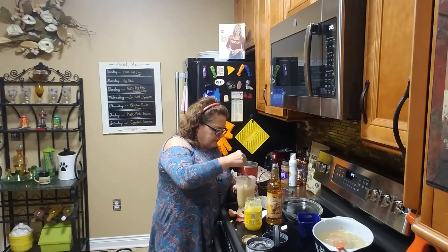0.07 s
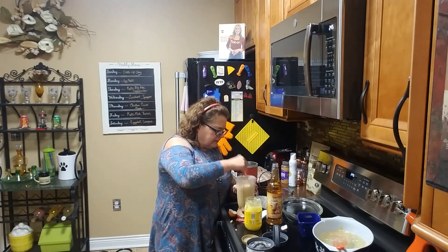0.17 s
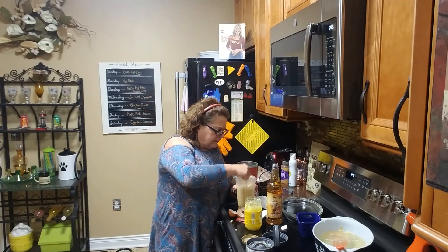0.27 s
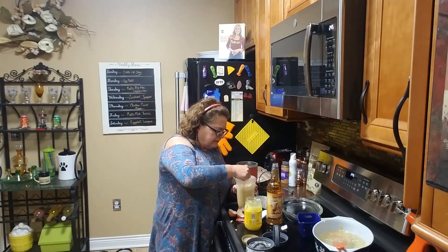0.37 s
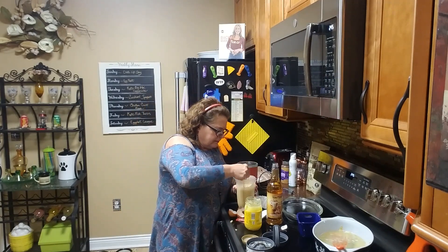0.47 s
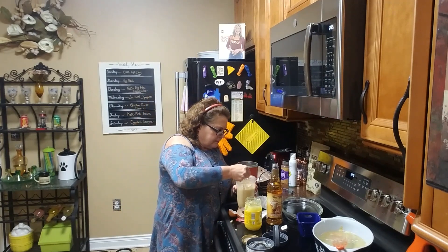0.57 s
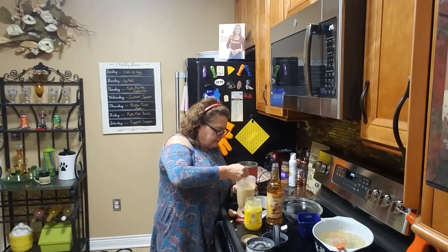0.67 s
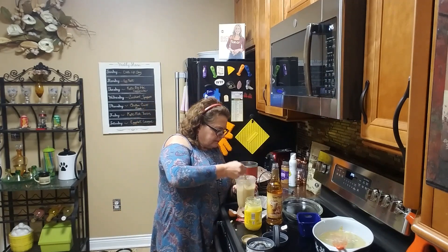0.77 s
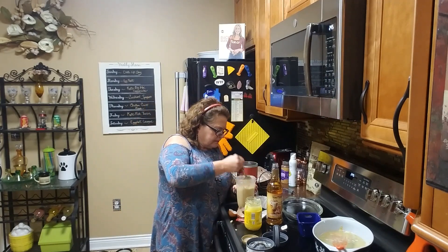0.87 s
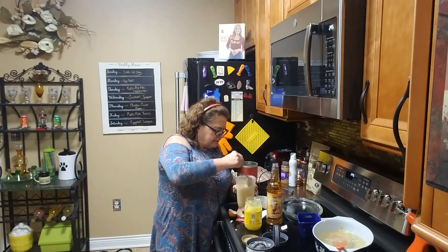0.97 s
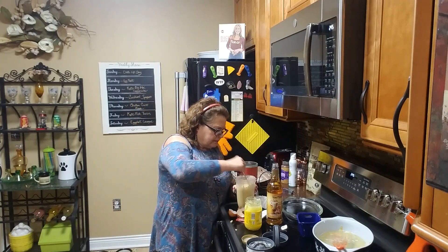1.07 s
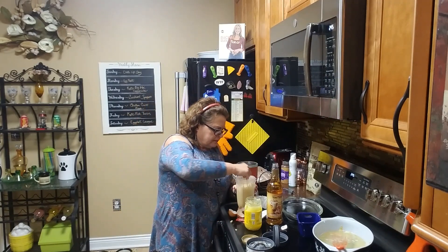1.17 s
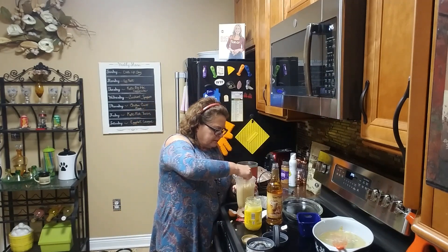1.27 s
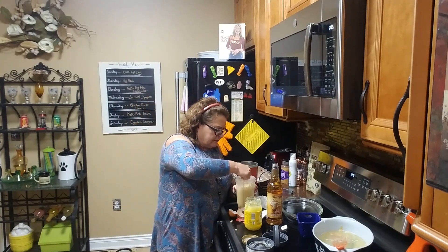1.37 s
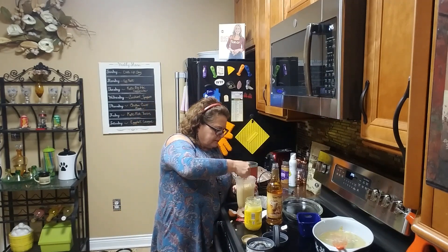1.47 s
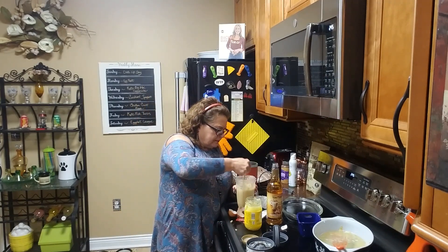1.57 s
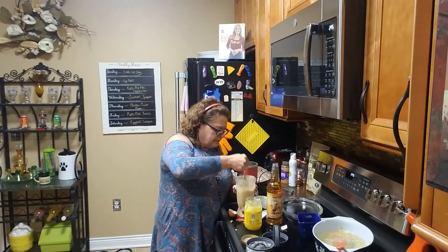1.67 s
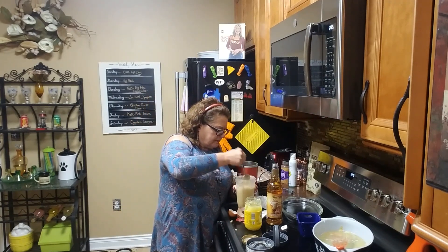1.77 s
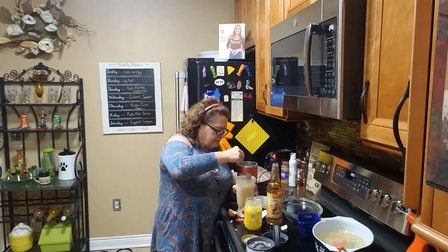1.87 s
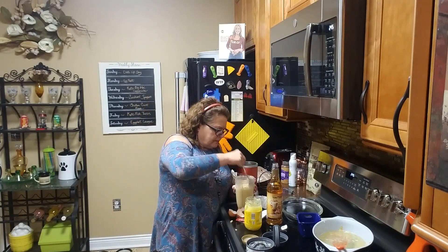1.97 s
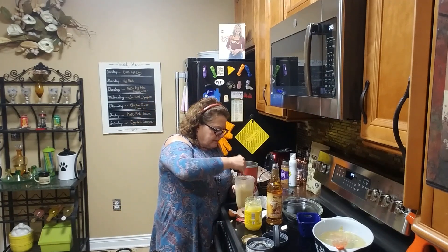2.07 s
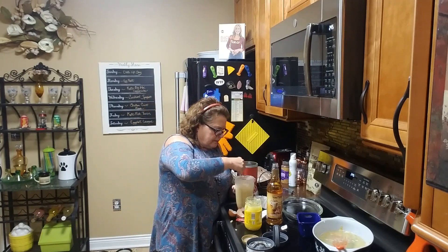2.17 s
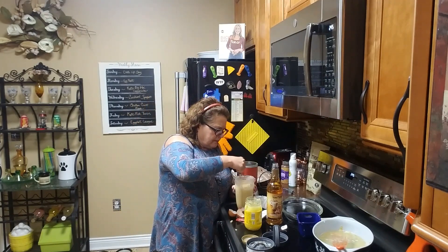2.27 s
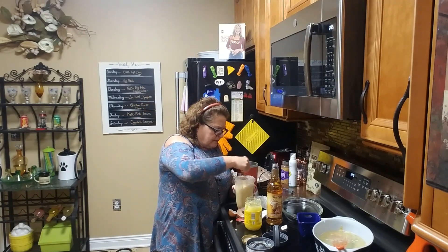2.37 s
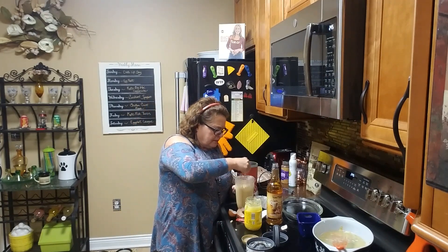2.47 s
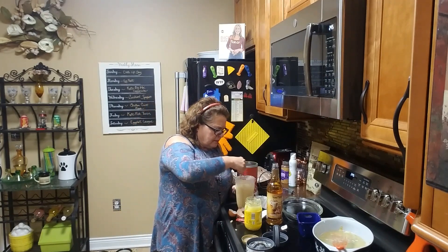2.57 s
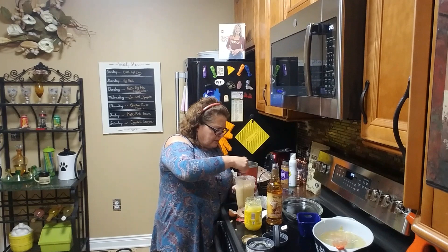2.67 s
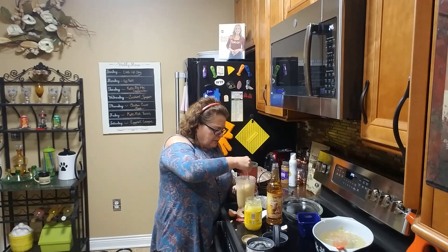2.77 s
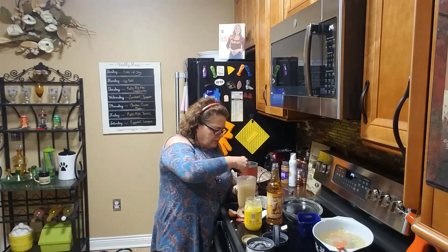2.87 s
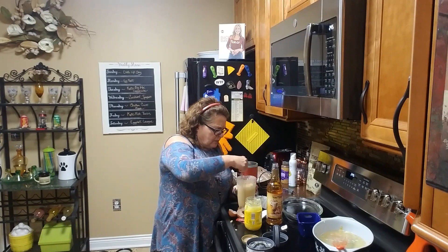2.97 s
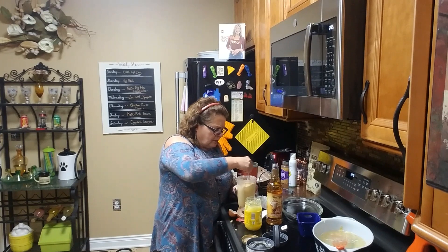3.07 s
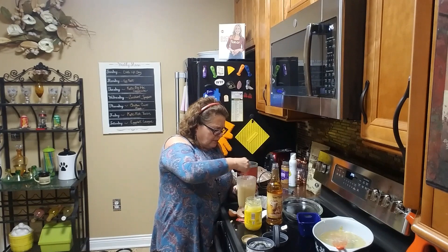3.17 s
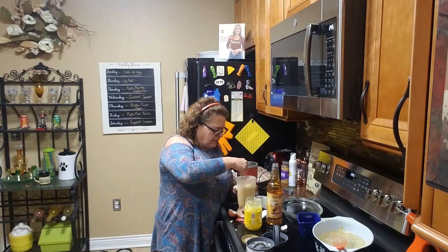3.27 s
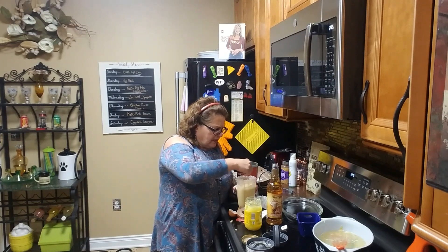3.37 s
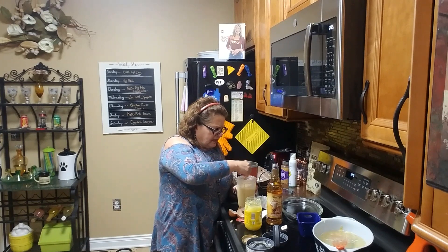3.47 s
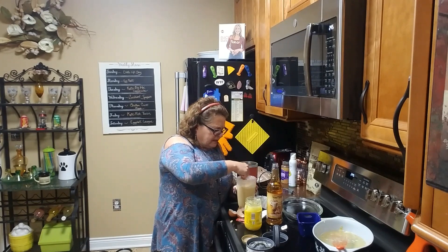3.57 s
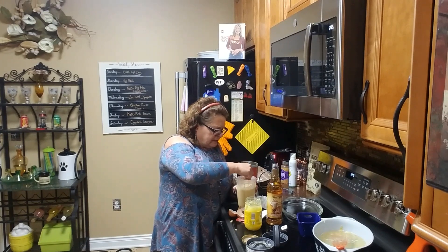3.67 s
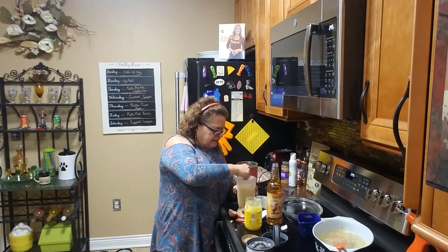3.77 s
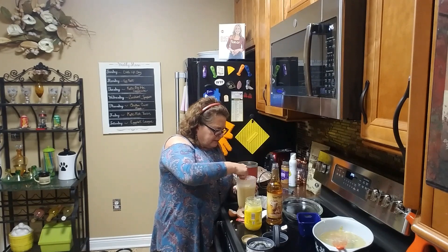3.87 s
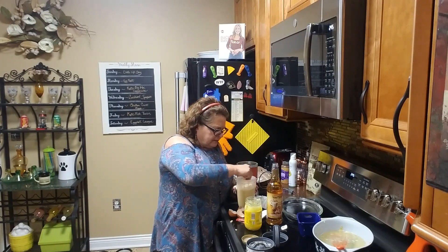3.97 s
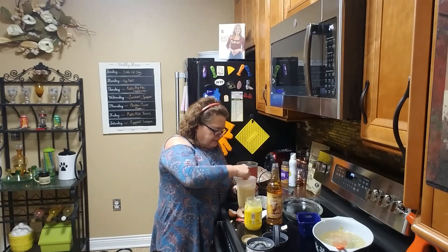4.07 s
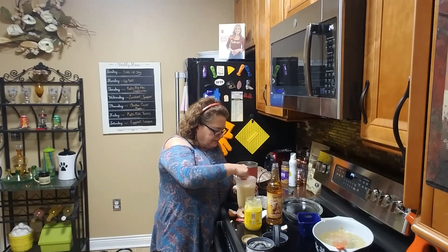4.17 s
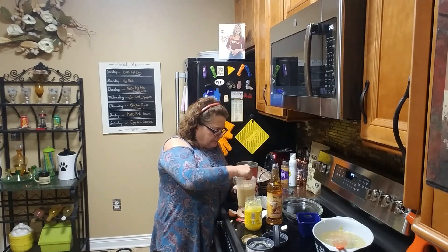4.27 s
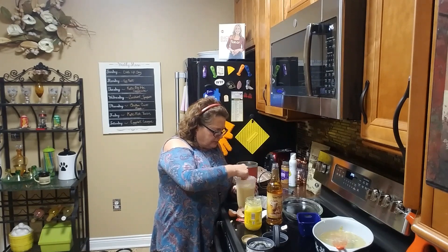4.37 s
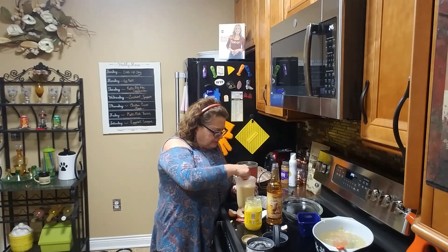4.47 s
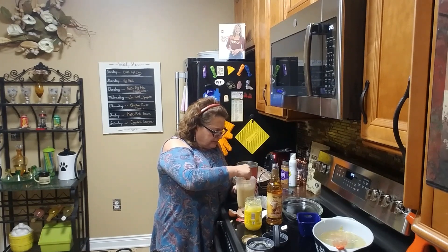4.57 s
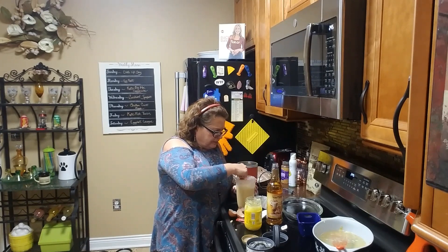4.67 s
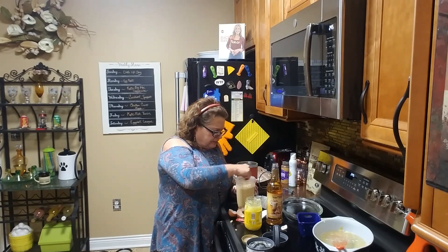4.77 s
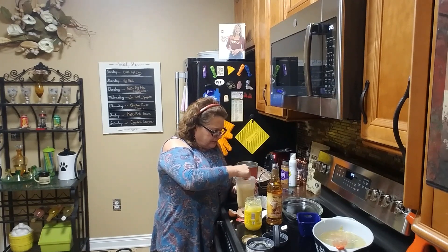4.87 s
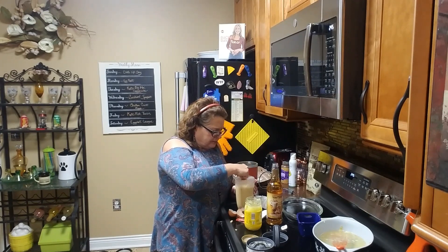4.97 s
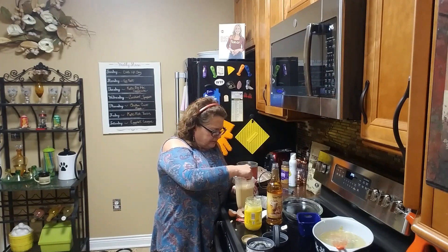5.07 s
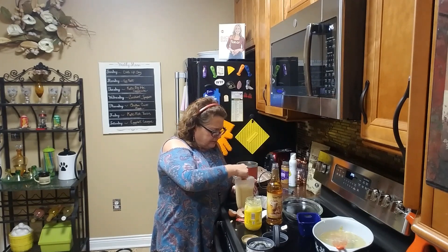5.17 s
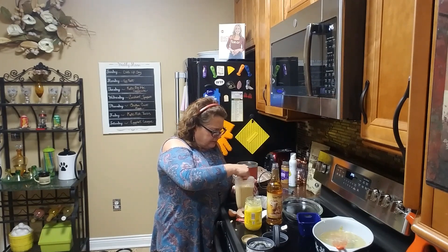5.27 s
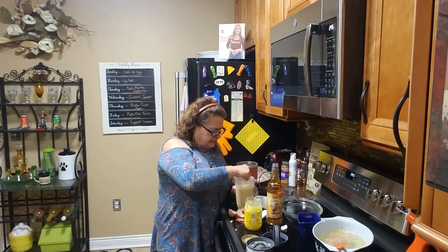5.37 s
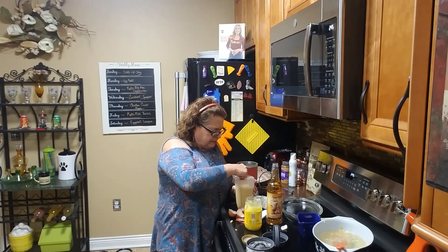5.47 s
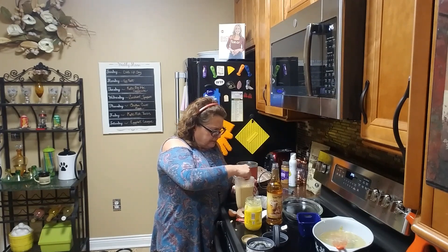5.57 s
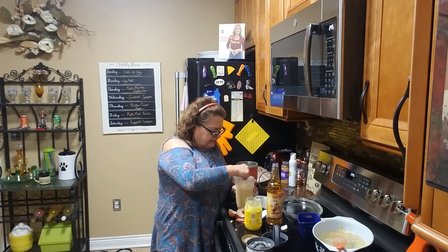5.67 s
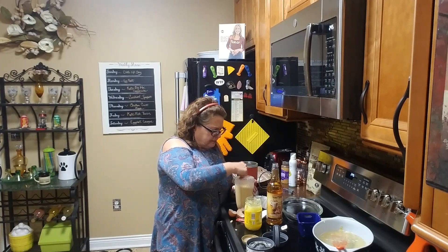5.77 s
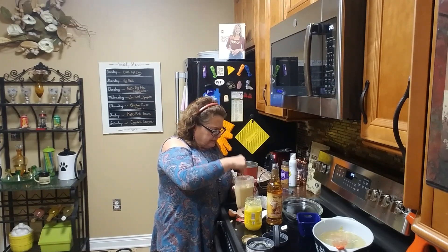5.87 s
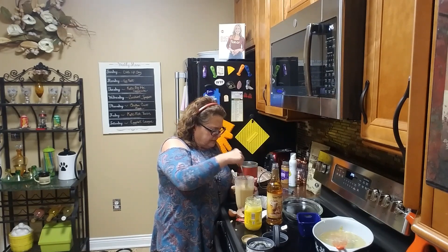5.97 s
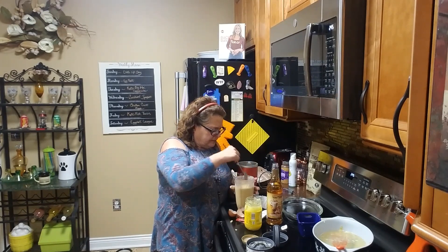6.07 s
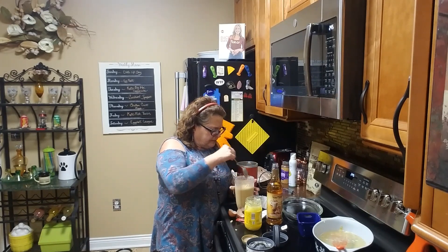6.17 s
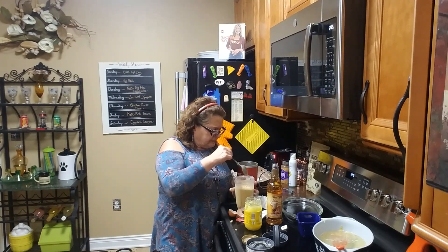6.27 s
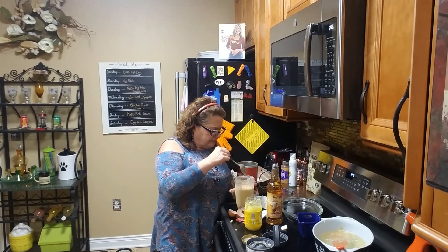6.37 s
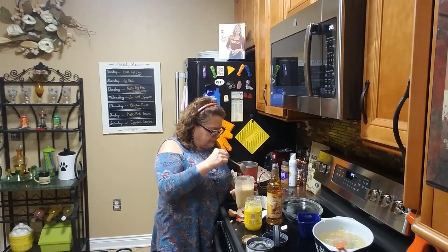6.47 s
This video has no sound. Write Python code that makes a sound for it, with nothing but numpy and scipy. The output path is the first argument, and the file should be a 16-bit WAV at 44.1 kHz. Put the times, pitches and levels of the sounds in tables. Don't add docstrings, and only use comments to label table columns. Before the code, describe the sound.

Quiet room tone with a low fridge hum in a small, hard kitchen, heard in stereo from a few metres away. From 0.1 to 0.5 s a spoon and glass are knocked about: small clacks and weighty wooden thuds. A near pause follows, then another loose cluster at 1.1 to 1.45 s. Around 1.8 s stirring starts, with firm blows from 2.0 s roughly every third of a second and lighter taps between. Each is a short, dry, drink-damped clack with a bright metallic tick, followed by a dull knock of the glass foot on the counter. Gritty scraping fills the gaps, easing before each blow. From 3.4 s it gets louder and denser, with almost four blows a second, loudest from 4.8 to 5.6 s. Stirring stops near 5.7 s; short reflections fade, a few faint taps follow around 5.9 s and later, and room tone remains until 6.5 s.

```python
import sys
import numpy as np
from scipy import signal
from scipy.fft import rfft, irfft, next_fast_len
from scipy.io import wavfile
from scipy.ndimage import uniform_filter1d

SR = 44100
rng = np.random.default_rng(int(sys.argv[2]) if len(sys.argv) > 2 else 0)


def dump(signal):
    limited = np.clip(np.atleast_2d(signal).T, -1, 1)
    pcm = np.round(limited * 32767).astype(np.int16)
    wavfile.write(sys.argv[1], SR, pcm)


def volts(x):
    e = np.asarray(x, float) / 20
    return 10 ** e


N = 288105
T = np.arange(N) / SR

# (f/Hz, level/dB, t60/s)
COUNTER_MODES = [(366, -8, 0.13), (433.7, 4.5, 0.056), (482, -1.5, 0.067)]
# (f/Hz, level/dB, t60/s)
UPPER_MODES = [(596, -0.5, 0.033), (676, -1.5, 0.028), (760.4, -1, 0.028), (825, -3.5, 0.033),
               (958, -7.5, 0.046), (1078, -7, 0.014), (880, -9, 0.016)]
# (f/Hz, level/dB, t60/s)
DEEP_MODES = [(58.3, -8, 0.15), (186.4, -11.5, 0.3), (218.6, -11, 0.12)]
# (t/s, clack/dB, thud/dB, hardness/dB)
BLOWS = [(1.992, -16.5, -20, -3), (2.3745, -16.5, -19, -4.5), (2.7225, -17.5, -18, -3),
         (3.052, -14, -14, -2.5), (3.364, -10.5, -15.5, 0), (3.676, -9.5, -12.5, -2.5),
         (3.968, -7.5, -11, -0.5), (4.225, -7, -12.5, 0.5), (4.495, -7, -14, 0.5), (4.7665, -5, -9, 1.5),
         (5.0306, -4, -15.5, 1.5), (5.2964, -3, -12.5, 3), (5.5613, -3, -16, 2.5)]
BLOW_HZ = 1640


def unit(x):
    return x / np.sqrt(np.mean(x ** 2))


def colour(x, hz, db):
    size = next_fast_len(x.shape[-1])
    f = np.arange(size // 2 + 1) * SR / size + 1
    weight = volts(np.interp(np.log(f), np.log(hz), db))
    return irfft(rfft(x, size) * weight, size)[..., :x.shape[-1]]


def causal_colour(x, hz, db):
    f = np.arange(2049) * SR / 4096 + 1
    cepstrum = irfft(np.log(volts(np.interp(np.log(f), np.log(hz), db))))
    cepstrum[1:2048] *= 2
    cepstrum[2049:] = 0
    response = irfft(np.exp(rfft(cepstrum)))
    return signal.fftconvolve(x, response)[:N]


def ring(modes, scatter_db, push_s, size=5000, detune=.04):
    t = np.arange(size) / SR
    hz, db, t60 = np.transpose(modes)[:, :, None]
    luck = rng.standard_normal((2, 9, 1))[:, :len(modes)]
    strength = volts(db + scatter_db * luck[0])
    tones = np.sin(2 * np.pi * hz * (1 + detune * luck[1]) * t)
    y = np.sum(strength * tones * 1000. ** (-t / t60), axis=0)
    push = np.sin(np.pi * np.clip((t[:64] + .5 / SR) / push_s, 0, 1)) + 1e-9
    y = np.convolve(y, push)[:size]
    return y / np.abs(y).max()


def add(out, s, y):
    i = int(s * SR)
    out[..., i:i + y.shape[-1]] += y[..., :N - i]


def contacts():
    # (t/s, clack/dB,
    # thud/dB, wall pitch f/Hz, hardness/dB)
    taps = [(1.816, -40, -32.5, 1600, -10), (1.881, -40.5, -32.5, 4140, -4),
            (1.907, -27, -36, 1700, 1), (2.081, -22.5, -14, 1710, 0.5), (2.1983, -22.5, -26, 2080, 0),
            (2.3014, -28, -27, 1500, 2), (2.4539, -23.5, -18, 1650, 2), (2.508, -40.5, -41, 1700, 7),
            (2.5531, -19.5, -18.5, 2160, 1), (2.659, -27.5, -23, 1570, 1.5),
            (2.7892, -23.5, -17, 1600, 4), (2.8947, -19, -20, 2090, -1.5), (2.9597, -26, -20, 1520, 2),
            (3.004, -29.5, -43, 2170, 4), (3.128, -27, -14, 1620, 3), (3.2017, -20, -18, 1780, 2),
            (3.2446, -30.5, -25, 1800, -3), (3.2937, -22.5, -20, 1600, -2),
            (3.4284, -19.5, -18, 2070, 0), (3.469, -25, -21, 2580, -6), (3.5289, -20, -19, 1620, -7),
            (3.555, -17, -52, 1470, 0),
            (3.7328, -19.5, -7, 1560, 1.5), (3.7971, -21, -14, 1820, 1),
                 (3.825, -20.5, -42, 1790, -6.5), (3.8538, -15.5, -10, 1630, -0.5),
                 (4.008, -25, -13, 1810, 4), (4.0789, -16.5, -12, 2230, 4), (4.123, -12.5, -13.5, 1810, 2),
                 (4.2712, -14, -13, 1550, -1.5), (4.3494, -18, -15, 1870, 3), (4.3753, -14, -51, 1580, -1),
                 (4.4089, -18, -12, 1280, 0), (4.428, -11, -33, 1820, 0), (4.6187, -24, -20.5, 2270, 5.5),
                 (4.658, -23, -19, 1750, -9), (4.8783, -17, -10, 2650, 0), (4.9155, -17.5, -27, 2190, -2),
                 (5.1424, -26.5, -19.5, 2580, 3), (5.1919, -7.5, -26, 1900, 0),
                 (5.467, -27.5, -55, 1710, 3.5)]
    # (t/s, clack/dB, thud/dB, wall pitch f/Hz, hardness/dB)
    strays = [(0.031, -54.5, -74, 2680, 13), (0.14, -33, -35, 2330, -1.5), (0.2088, -18, -12, 1300, -2.5),
              (0.283, -34.5, -38, 2270, 5.5), (0.3224, -25, -8.5, 1560, -1), (0.3789, -29, -19, 1300, -1),
              (0.4846, -33, -30.5, 1810, -4.5), (0.6719, -33, -64, 2110, -1), (0.8967, -43, -39, 1050, -8),
              (1.133, -25, -9, 1690, -0.5), (1.1755, -28, -18, 2670, -0.5),
              (1.2299, -24.5, -16.5, 2300, -3), (1.3288, -29.5, -54, 2300, 0), (1.4214, -33, -34, 1260, -5),
              (1.4475, -20, -35, 1730, -5), (1.726, -47, -41, 2830, -3), (5.8404, -36.5, -64, 2240, -2),
              (5.8726, -42, -55, 2630, 3), (5.8945, -30, -62, 2530, -11), (5.899, -26, -30, 1210, -4.5),
              (5.9015, -31, -62, 3870, -3), (6.0112, -38, -63, 2500, -1), (6.148, -59, -67, 5000, 2.5),
              (6.232, -45.5, -67, 1500, -2.5), (6.302, -58, -67, 2510, 11), (6.4332, -56, -57, 1550, 8.5)]
    blows = [row[:3] + (BLOW_HZ, row[3]) for row in BLOWS]
    return blows + taps + strays


def effort_db(s):
    # (t/s, level/dB)
    effort = [(.12, -78.5), (.28, -49.5), (.38, -61), (.52, -68), (.62, -78), (1.11, -75.5), (1.15, -51),
              (1.33, -57.5), (1.55, -67), (1.8, -78), (2.05, -53.5), (2.9, -55), (3.5, -49.5), (3.8, -47.5),
              (4.9, -46), (5.35, -47.5), (5.62, -44), (5.82, -84)]
    return np.interp(s, *np.transpose(effort))


def air():
    # (f/Hz, level/dB per Hz)
    tone_colour = [(18, -53), (30, -18), (100, -4.5), (148, -13.5), (243, -3.5), (324, -10.5), (532, -9.5),
                   (639, -18), (1360, -22), (1510, -22.5), (2070, -30), (2690, -33), (15500, -40)]
    # (t/s, room tone/dB, bass swell/dB)
    drift = [
        (0, -56.5, 3.5),
        (.45, -52, 5),
        (.6, -60.5, -6),
        (1.1, -62.5, -1),
        (1.75, -62, -1.5),
        (2.9, -42.5, -15),
        (3.6, -60.5, 13.5),
        (5.6, -49, 2.5),
        (5.9, -56, 4.5),
        (6.53, -57.5, 5),
    ]
    # (f/Hz, level/dB rms)
    fridge = [(97, -94), (474, -70), (528, -99.5), (1540, -64.5)]
    s, tone_db, bass_db = np.transpose(drift)
    mid, side = colour(rng.standard_normal((2, N)), *np.transpose(tone_colour))
    side = colour(side, [40, 150, 1500], [-2, -10, -1])
    tone = unit(mid + side * np.array([[1], [-1]]))
    tone = tone + sum(volts(db + 48.0) * np.sin(2 * np.pi * hz * T) for hz, db in fridge)
    bass = colour(tone, [150, 300], [0, -40])
    swell = volts(np.interp(T, s, bass_db))
    return volts(np.interp(T, s, tone_db)) * (tone - bass + swell * bass)


def clacks():
    # (f/Hz, level/dB, t60/s)
    wall_modes = [(1300, 8, 0.01), (1800, 22, 0.0049), (2506, 11, 0.015), (3860, -1.5, 0.035),
                  (4940, 10.5, 0.013)]
    # (f/Hz, level/dB, t60/s)
    linger_modes = [(1530, -4, .04), (1922, -6, .032), (2580, -9, 0.024)]
    # (f/Hz, level/dB)
    edge_colour = [(1500, 2.5), (3000, 3), (5000, -1.5), (7700, -15.5), (10000, -13.5), (16000, -16)]
    bright_hz, tap_linger_db = 2300, -23
    spot_db, spot_t60_s, soft_ring = 22, 0.0053, 0.1
    ear_share, lag_s = 0.37, .0006
    out, t = np.zeros((2, N)), np.arange(2048) / SR
    for s, db, _, hz, hard_db in contacts():
        is_blow = hz == BLOW_HZ
        modes = [(f, g + hard_db * (f > bright_hz), t60) for f, g, t60 in wall_modes]
        modes += [(f, g + tap_linger_db * (not is_blow), t60) for f, g, t60 in linger_modes]
        modes.append((hz, spot_db, spot_t60_s * np.exp(-soft_ring * hard_db)))
        scatter_db = 1.5 if is_blow else 2.5
        ways = np.array([ring(modes, scatter_db, .00025, size=2048, detune=.01) for way in range(3)])
        wall = ways[0] + ear_share * ways[1:]
        wall *= 1 - .85 * np.exp(-t / .0009)
        crack = colour(rng.standard_normal((2, 2048)), *np.transpose(edge_colour))
        crack *= 1000. ** (-t / 0.014) + 0.18 * 1000. ** (-t / 0.2)
        crack_db = hard_db + min(db - 9, -25 + 0.25 * db)
        add(out, s + lag_s, volts(5.0) * (volts(db) * wall + volts(crack_db) * crack))
    return out


def footing(s):
    # (t/s, pitch f/Hz, upper modes level/dB, deep modes level/dB)
    firm = [(0.2091, 486, 3, 15), (0.3232, 399, -0.5, -3), (0.3787, 410, -5, 1), (0.4854, 413, 1.0, -5),
            (1.134, 324, -3.0, 2), (1.1755, 342, -4, -7), (1.2299, 590, 2.5, -12.0), (1.816, 477, 6.5, 20),
            (1.9964, 483, 1, 4), (2.082, 394, -7, -10), (2.2024, 380, 2.5, -5), (2.3786, 490, -3.0, -9),
            (2.4539, 399, 1, -8), (2.5531, 375, 3.5, -7), (2.659, 382, -2.0, -12.0), (2.7274, 446, 2, -2),
            (2.7896, 371, 1.5, 1), (2.899, 366, 5.0, 8), (2.9606, 416, 2.5, -4), (3.0561, 465, 3.5, 1),
            (3.128, 403, -2, 8), (3.2017, 460, 2.5, -5.0), (3.2451, 425, -14, 3.0),
            (3.2933, 435, -2.5, -3.0), (3.3681, 450, -16, 4), (3.4282, 590, 4, 11), (3.469, 430, -5.0, 15),
            (3.5285, 366, 3.5, 19), (3.6801, 440, -3.0, 10), (3.7326, 424, 2, 8), (3.7967, 433, -7, 5.0),
            (3.8536, 431, -5, 7), (3.9721, 463, -1, -2), (4.008, 427, 0, 6), (4.0787, 448, -2, -3),
            (4.127, 414, 3, -10), (4.2291, 430, 5.5, -5), (4.2716, 486, 4.5, 0.0), (4.3491, 408, 3.5, -15),
            (4.4086, 404, -8.0, 4), (4.4991, 422, -0.5, 3), (4.6194, 430, -2, 9), (4.662, 430, 9.5, 7),
            (4.7703, 453, 2.0, -2), (4.8781, 430, -10, -8), (4.919, 401, 9, -2.0), (5.0347, 430, 8.5, -0.0),
            (5.1429, 437, 1, 5), (5.3008, 427, 4, 2), (5.5657, 490, -2, 11)]
    row = min(firm, key=lambda r: abs(r[0] - s))
    return tuple(row[1:]) if abs(row[0] - s) < .009 else (410, 0, 0)


def thuds():
    # (t/s, thud/dB, pitch f/Hz, upper level/dB, deep level/dB)
    rocks = [(0.176, -24, 370, -16, -2), (0.246, -22, 494, -6, 12.0), (1.296, -20.5, 385, 9, -1.0),
             (3.507, -20, 407, -7, 9), (3.576, -20.5, 438, -1, 6.0), (3.633, -18.5, 364, 3.5, 16),
             (4.027, -18, 376, 6, 7), (4.163, -26.5, 405, 11, 18), (4.44, -28.5, 374, 18, 8),
             (4.545, -17.5, 357, 6, 5), (4.569, -20, 363, -9, 10), (4.685, -12.5, 408, -0.5, 1.0),
             (4.743, -19, 486, -1, 9), (4.82, -18, 366, 10, 21), (4.934, -13, 423, 3.5, 11),
             (5.083, -14, 500, 4.5, -2.0), (5.117, -25, 330, 3, 1), (5.201, -14, 410, 0, 5),
             (5.229, -25, 368, 1.5, 15), (5.362, -13, 363, -13, 5), (5.412, -23, 362, 1, 14),
             (5.614, -10.5, 406, 2.5, 1)]
    foot_lag_s, set_down_s = 0.00409, 1.2
    out = np.zeros(N)
    rise = 1 - 0.62 * np.exp(-T[:5000] / 0.0029)
    knocks = []
    for s, clack_db, thud_db, *_ in contacts():
        s += foot_lag_s * (clack_db > thud_db)
        knocks.append((s, thud_db, *footing(s)))
    for s, db, hz, upper_db, deep_db in knocks + list(rocks):
        body = ring(COUNTER_MODES + [(hz, 8, .045)], 2.5, .0008, detune=.02)
        upper = ring(UPPER_MODES, 3.5, .0004)
        deep = ring(DEEP_MODES, 2.5, .0012, detune=.04 / 3)
        deep_db = .45 * deep_db + 0.5
        deep_db += 0.7 * max(effort_db(s) + 42.5, -12)
        deep_db += 2.2 * (s < set_down_s)
        knock = body + volts(upper_db - 2) * upper + volts(deep_db) * deep
        add(out, s, volts(db - 2.5) * rise * knock)
    return out


def bumps():
    size = int(SR / 45)
    return 6.5 * uniform_filter1d(np.repeat(rng.standard_normal(400), size)[:N], size // 2)


def turns_db():
    lift_db, lift_s, settle_db, settle_s = -7.5, 0.11, 2.5, 0.027
    total = 0
    for s, *_ in BLOWS:
        gap = np.abs(T - s)
        total = total + np.where(T < s, lift_db * np.exp(-gap / lift_s), settle_db * np.exp(-gap / settle_s))
    return total


def swishes():
    # (t/s, level/dB, length/s)
    slides = [(0.28, -67, 0.083), (1.22, -56, 0.014), (1.409, -60, 0.062), (2.088, -76, 0.018),
              (2.487, -85, 0.025), (2.787, -78, 0.037), (3.09, -65, 0.019), (3.289, -49.5, 0.013),
              (3.466, -51, 0.0082), (3.51, -50, 0.092), (3.73, -52, 0.014), (4.007, -47, 0.011),
              (4.26, -60, 0.013), (4.366, -40, 0.031), (4.654, -38.5, 0.029), (4.917, -42, 0.018),
              (5.187, -54, 0.036), (5.288, -45, 0.052), (5.464, -48.5, 0.016)]
    attack_s, release_s = 0.0091, 0.02
    level = 0
    for s, db, length in slides:
        fade = np.exp(-np.maximum(T - s - length, 0) / release_s)
        level = level + volts(db) * np.clip((T - s) / attack_s, 0, 1) * fade
    return level


def drag():
    # (f/Hz, level/dB per Hz)
    scrape_colour = [(530, -5.5), (900, -1.5), (1410, -7.5), (2570, -11), (3430, -19.5), (7860, -32),
                     (9650, -32.5), (16000, -18.5)]
    slips = (rng.random((3, N)) < .12) * rng.standard_normal((3, N))
    grit = slips * volts(1.8 * rng.exponential(size=(3, N)))
    scrape = unit(colour(grit[:2], *np.transpose(scrape_colour)))
    fine = unit(colour(grit[:2], [3970, 7900, 8800, 12300, 16300], [7.5, -7.5, -5.5, 3.5, -2.5]))
    counter = ring(DEEP_MODES + COUNTER_MODES + UPPER_MODES[:2], 0, 0.0013)
    rumble = unit(signal.fftconvolve(grit[2], counter)[:N])
    press = volts(effort_db(T) + turns_db() + bumps())
    slide = swishes()
    out = (press + volts(-2) * slide) * scrape
    out = out + (volts(4.5) * press + volts(-4) * slide) * rumble
    return out + (volts(-12) * press + slide) * fine


def ticks():
    # (t/s, level/dB)
    catches = [(0.1431, -43), (0.2079, -52), (0.2816, -36), (0.4369, -55), (0.8964, -52), (1.1348, -49),
               (1.1752, -48), (1.2297, -34), (1.4186, -40), (1.4471, -45), (1.879, -54), (1.9066, -50),
               (1.9924, -42), (2.0747, -47), (2.1106, -42), (2.1994, -44), (2.3027, -41), (2.375, -36),
               (2.4553, -46), (2.508, -38), (2.5516, -44), (2.6574, -39), (2.7227, -37), (2.79, -43),
               (2.9607, -49), (3.051, -35), (3.1293, -36), (3.2011, -48), (3.2924, -33), (3.3638, -40),
               (3.47, -30), (3.5239, -31.5), (3.5554, -28), (3.6785, -39), (3.7319, -29.5), (3.9664, -45),
               (4.0086, -28.5), (4.079, -35), (4.2243, -37), (4.2737, -32), (4.3475, -45), (4.373, -36),
               (4.4952, -45), (4.617, -45), (4.661, -31), (4.7656, -35), (4.8778, -41), (4.9142, -34),
               (5.0305, -45), (5.1911, -41), (5.2959, -33), (5.4677, -28.5), (5.561, -36), (5.8247, -54)]
    out = np.zeros((2, N))
    for s, db in catches:
        burst = unit(colour(rng.standard_normal((2, 2048)), [3000, 8000, 10100, 16000], [-26, -9, -2, -1.0]))
        add(out, s, volts(db - 1) * burst * 1000. ** (-T[:2048] / 0.034))
    return out


def kitchen(x, wet_db):
    # (f/Hz, t60/s, level/dB, likeness of left and right/0-1)
    tail = [(117, 0.2, -3, 0.98), (285, 0.21, 3, 1), (493.5, 0.29, -3, 0.68), (1030, 0.39, 1.5, 0.32),
            (2160, 0.37, -2.5, 0.35), (3760, 0.39, -5.5, 0), (7600, 0.41, -5.5, 0.71),
            (15300, 0.1, -47, .02)]
    # (t/s, left level/dB, right level/dB)
    echoes = [
        (.0038, -5, -3),
        (.0098, -12, -10),
    ]
    t = np.arange(24000) / SR
    octaves = np.log(np.arange(12001) * SR / 24000 + 1)
    centres = np.log([band[0] for band in tail])
    reply = np.zeros((2, len(t)))
    for k, (hz, t60, db, like) in enumerate(tail):
        mid, side = rng.standard_normal((2, len(t)))
        like = np.clip(like, 0, 1)
        pair = np.sqrt(1 + like) * mid + np.sqrt(1 - like) * side * np.array([[1], [-1]])
        share = np.interp(octaves, centres, np.arange(len(tail)) == k)
        band = irfft(rfft(pair) * np.sqrt(share))
        decay = 1000. ** (-t / t60) + 2.1 * 1000. ** (-t / 0.039)
        reply += volts(db - 21.5 + wet_db) * band * decay
    reply *= 1 - np.exp(-t / 0.0022)
    reply[:, 0] += 1
    for s, left_db, right_db in echoes:
        reply[:, int(s * SR)] += volts(np.array([left_db, right_db]))
    return signal.fftconvolve(x, reply, axes=1)[:, :N]


def microphones(heard):
    # (f/Hz, level/dB, left minus right/dB)
    response = [(40, -44.5, 7.5), (119, -16, -2.5), (194, -16, -1), (269, -9.5, -4), (327, -4.5, -0.5),
                (750, 2, -2.5), (1380, -3, -3), (2300, 1, -5.5), (5230, 1.5, -6), (6640, 1.5, -9.5),
                (7840, 7, -12), (8530, 4, 0.5), (9400, -6, 9), (13300, -0.5, -0.5)]
    hz, db, pan_db = np.transpose(response)
    left = causal_colour(heard[0], hz, db + pan_db / 2)
    right = causal_colour(heard[1], hz, db - pan_db / 2)
    return np.array([left, right]) * volts(-2.5)


def scene():
    sway_hz = 1.1
    spots = np.cos(np.pi * (sway_hz * T + np.arange(3)[:, None] / 3)) ** 8
    spots = spots / spots.sum(axis=0)
    rim, foot = clacks() + ticks(), thuds() + drag()
    heard = 0
    for source, wet_db in ((rim, -7.5), (foot, -2.5)):
        for spot in spots:
            heard = heard + kitchen(source * spot, wet_db)
    return microphones(heard) + air()


def top_cut(x):
    return signal.sosfilt(signal.butter(12, 16980, fs=SR, output="sos"), x)


def record(dry):
    low_pass = signal.ellip(8, .2, 70, 15750, fs=SR, output="sos")
    return top_cut(signal.sosfilt(low_pass, dry))


dry = scene()
out = record(dry)
dump(out)
```